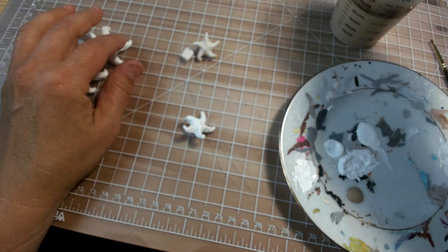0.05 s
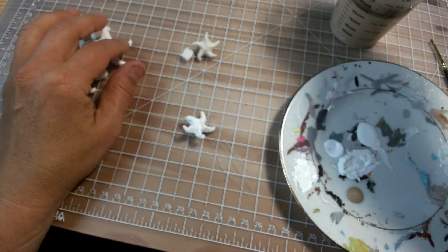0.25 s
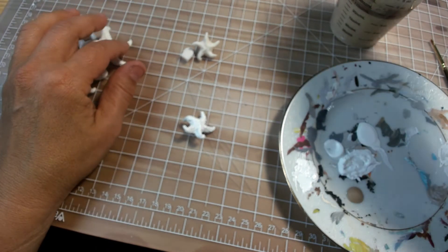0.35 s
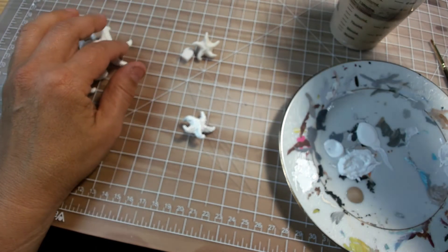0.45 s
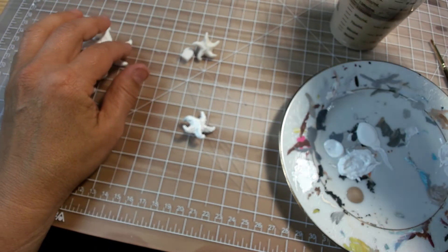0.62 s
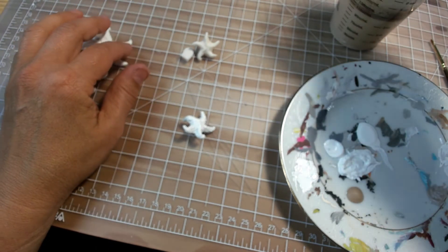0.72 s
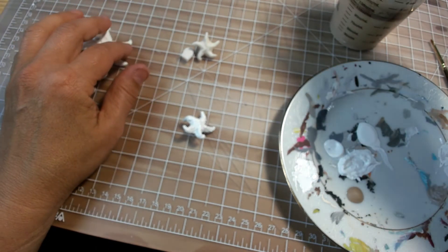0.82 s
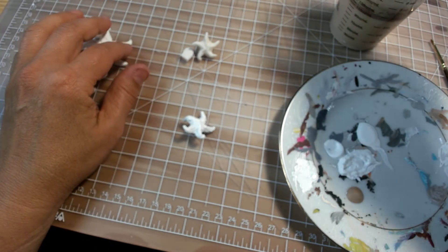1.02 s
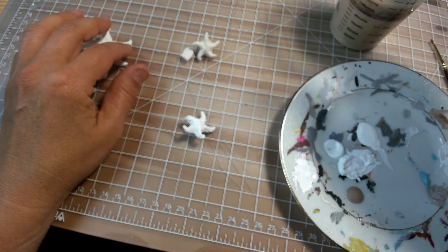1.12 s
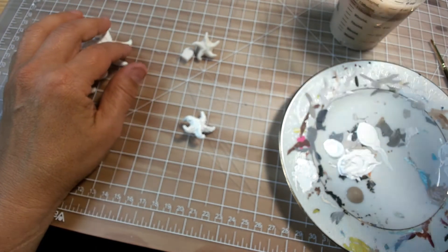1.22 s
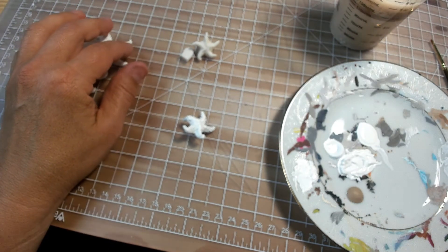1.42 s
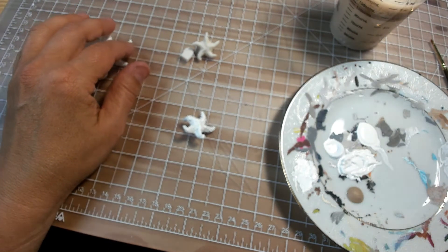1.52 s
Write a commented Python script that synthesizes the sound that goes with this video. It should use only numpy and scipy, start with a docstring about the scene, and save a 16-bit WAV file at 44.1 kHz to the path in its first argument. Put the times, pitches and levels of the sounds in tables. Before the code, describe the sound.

Small hard clay pieces click together and are set down on a plastic mat.

```python
"""A small, hard clay piece is nudged, tips over and rings, close by on a plastic mat.
Pieces held under the fingers click dryly, some knocking the mat; one more drops and rocks to rest.
Each impact gives a crack of noise and excites the damped modes of the object struck.
Between the clicks, friction makes gritty swells as the fingers rub the clay.
A small, quiet room reverberates over a low ventilation hum."""
import sys
import numpy as np
from scipy import signal
from scipy.fft import rfft, irfft, next_fast_len
from scipy.io import wavfile
from scipy.ndimage import uniform_filter1d

SR = 44100
rng = np.random.default_rng(int(sys.argv[2]) if len(sys.argv) > 2 else 0)


def to_wav(sig):
    """Store sig (one row per channel, or 1-D mono) as 16-bit WAV at the path in sys.argv[1].

    Samples outside -1..1 are clipped; the rate is SR.
    """
    pcm = np.clip(np.atleast_2d(sig), -1, 1) * 32767
    pcm = np.round(pcm).astype(np.int16)
    wavfile.write(sys.argv[1], SR, pcm.T)  # frames by channels


N = 68355
t = np.arange(N) / SR
TOP_HZ = 16000


def held_clicks():
    """Damping by contact: pieces held under the hand lose their vibration fast and click dryly."""
    # Each row: start in seconds, relative level, body and treble in dB, pitch ratio,
    # presence in dB, body resonance in Hz.
    contacts = [(.3235, -2, -4, 4, 1.034, -2.5, 1420), (.3302, -6, -0.5, -4, .99, 2, 1307),
                (.3585, -30.5, 14, -11, .99, 1.5, 1500), (.4203, -39, 23.5, -11, 1.03, 6, 1540),
                (.4374, -15.5, 5, 0.5, .98, -2.5, 2000), (.4502, -21.5, 6.5, -1, 1.01, 2, 1930),
                (.5315, -39.5, 6, -10.5, .98, 12.5, 1699), (.5474, -13.5, 3, -1.5, 1.0, .5, 1544),
                (.6636, -20.5, 10.5, -0.5, .99, 7, 1920), (.7678, -6, -1.5, -1.5, 1.09, -4.5, 2100),
                (.7773, -11.5, -0.5, -2.5, 0.98, -2.5, 1390)]
    # Each row: mode frequency in Hz, relative level in dB.
    modes = [(1380, -12), (1800, -13.5), (2050, -14), (2480, -19), (3310, -8), (3700, -8), (4750, -9),
             (5250, -4), (5600, -12), (6150, -4), (6600, -7.5), (7620, -8), (8100, -13), (9270, -19.5)]
    return undb(-1.5) * impacts(contacts, modes, ring_t60=0.043, damping=0.54,
                                crack_db=0.5, crack_t60=0.012, rise_s=0.00059)


def tipping_piece():
    """Free vibration: a hollow-sounding piece is nudged, tips over and rings in its own modes."""
    # Each row: start in seconds, relative level, body and treble in dB, pitch ratio.
    contacts = [(.0651, -27.5, 11.5, 4, .935), (.0805, -34, 5, -2, 1.1), (.2012, -17, -1.5, 5, 0.96),
                (.2036, -20.5, 0.5, -11.5, 0.97), (.2115, -25.5, 1.5, -15, 1), (.2185, -27, 5, -13, 1.04),
                (.2275, -31.5, 9, 0.5, .98)]
    # Each row: mode frequency in Hz, relative level in dB.
    modes = [(840, -5), (930, -18.5), (1390, -9), (1520, -13), (1900, -8), (2085, -8.5), (2600, -9.5),
             (3300, -13.5), (3600, -8.5), (4580, -14), (5170, -4.5), (5500, -5), (6520, -7.5), (7050, -9.5),
             (8340, -12)]
    return undb(-2.5) * impacts(contacts, modes, ring_t60=0.062, damping=0.25,
                                crack_db=-1.5, crack_t60=0.011, rise_s=0.00032)


def rocking_piece():
    """Inelastic collisions: a dropped piece lands, then rocks to rest in ever weaker contacts."""
    # Each row: start in seconds, relative level, body and treble in dB.
    contacts = [(1.1503, -13.5, 2, -6), (1.1516, -7, -4, -17), (1.2074, -22.5, -3, -14),
                (1.2296, -24.5, 1, -18), (1.2398, -27, 0.5, -13), (1.2572, -29, 3.5, -16),
                (1.2643, -32.5, 5.5, -15), (1.2775, -39.5, 9, -14)]
    # Each row: mode frequency in Hz, relative level in dB.
    modes = [(830, -21.5), (980, -22.5), (1385, -8.5), (1510, -16.5), (2030, -16.5), (3430, -6.5),
             (3630, -10), (5050, -11.5), (5850, -7), (6150, -8), (6760, -13.5), (8680, -9)]
    return undb(-1.5) * impacts(contacts, modes, ring_t60=0.063, damping=0.55,
                                crack_db=2.5, crack_t60=0.013, rise_s=0.00034)


def mat_knocks():
    """Structure-borne sound: some blows pass into the mat and desk and excite their lower modes."""
    # Each row: start in seconds, relative level in dB.
    contacts = [(.3245, -27), (.3490, -37.5), (.5480, -44), (.7685, -33.5)]
    # Each row: mode frequency in Hz, relative level in dB.
    modes = [(440, -8), (560, -5.5), (670, -7), (780, -4), (1025, 2), (1320, -2.5)]
    return undb(4) * impacts(contacts, modes, ring_t60=0.085, damping=0.5,
                             crack_db=-9, crack_t60=0.088, rise_s=0.002)


def impacts(contacts, modes, **material):
    """Superposition: the sounds of all the contacts of one object add up."""
    out = np.zeros(N)
    for start, *blow in contacts:
        add(out, start, strike(modes, *blow, **material))
    return out


def strike(modes, level_db, body_db=0, treble_db=0, pitch=1, presence_db=0, body_hz=1450, *,
           ring_t60, damping, crack_db, crack_t60, rise_s):
    """Impulse excitation: a blow cracks and rings the modes, coloured by where and how hard it lands."""
    # Each row: frequency in Hz, relative spectral density of the crack in dB.
    crack_spectrum = [(60, -45), (600, -11), (1300, -14), (2000, -5.5), (2800, -12.5), (3500, 1.5),
                      (4300, -10), (5700, 1.5), (7800, -4.5), (10500, -17), (15000, -22.5), (17000, -30)]
    size = 8192
    age, hz = t[:size], np.array(modes)[:, :1]
    # ring_t60 is the ring time in seconds at 1 kHz; it falls with frequency to the power 'damping'.
    decays = np.array([undb(db) * fade(ring_t60 * (f / 1000) ** -damping)[:size] for f, db in modes])
    scatter = undb(1.2 * rng.standard_normal(hz.shape))
    phase = rng.random(hz.shape)
    ring = (scatter * decays * np.sin(2 * np.pi * (hz * pitch * age + phase))).sum(0)
    crack = undb(crack_db) * noise(crack_spectrum, size) * fade(crack_t60)[:size]
    onset = 1 - np.exp(-(age / rise_s) ** 2)
    tone = [(body_hz / 2, body_db / 2 - 7.5), (body_hz, body_db + 3),
            (2700, (body_db + presence_db) / 3), (3600, presence_db), (5000, 0), (7800, 0),
            (10800, treble_db), (TOP_HZ, 1.4 * treble_db)]
    return undb(level_db) * colour((ring + crack) * onset, tone)


def rubbing(grain_hz=450, grain_db=3.2):
    """Sliding friction: dry clay moves on clay under the fingers in short, gritty swells of noise."""
    # Each row: start in seconds, length in seconds, level in dB.
    rubs = [(0.068, 0.12, -56), (0.218, .035, -47.5), (0.267, 0.056, -42), (0.29, .01, -41.5),
            (0.337, .03, -37), (0.476, 0.082, -56), (0.674, 0.13, -51), (.90, 0.072, -62)]
    # Each row: frequency in Hz, relative spectral density in dB.
    spectrum = [(500, -22.5), (1500, -7), (2600, -10), (3500, 0), (5500, 0), (8000, -1.5), (10000, -14),
                (15000, -21), (17000, -26)]
    swell = np.zeros(N)
    for start, length, db in rubs:
        add(swell, start, undb(db) * np.sqrt(np.hanning(int(length * SR))))
    grit = noise(spectrum) * undb(grain_db * walk(grain_hz))
    return swell * unit(grit)


def room(x, early_delay_s=0.006, early_t60=0.086, late_delay_s=0.02):
    """Reverberation: early reflections from the desk and nearby things, then the walls' diffuse tail."""
    # Each row: frequency in Hz, gain of the reflections in dB.
    wall_colour = [(200, 0), (700, 7), (1400, 2), (3500, -1), (7000, -7.5), (11000, -8.5), (16000, -14.5)]
    # Each row: frequency in Hz, time to decay by 60 dB in seconds.
    decay_times = [(300, 0.32), (1500, 0.24), (5000, 0.4), (8000, .36), (14000, 0.31)]
    hz = np.arange(N // 2 + 1) * SR / N
    spectrum = rfft(rng.standard_normal(N))
    late = np.zeros(N)
    for centre, t60 in decay_times:
        band = along([(f, float(f == centre)) for f, _ in decay_times], hz)
        late += irfft(spectrum * band, N) * fade(t60)
    early = rng.standard_normal(N) * fade(early_t60)
    response = np.zeros(N)
    add(response, early_delay_s, undb(-13.5) * unit(early))
    add(response, late_delay_s, undb(-17.5) * unit(late))
    return signal.fftconvolve(x, colour(response / np.sqrt(N), wall_colour))[:N]


def ventilation(waver=0.34):
    """Broadband and tonal noise: a low rush of air, with hum lines wavering in amplitude and phase."""
    # Each row: frequency in Hz, relative spectral density in dB.
    air_spectrum = [(15, -84), (25, -33), (87, -21.5), (108, -7), (200, -5), (263, -5), (285, -7.5),
                    (516, -15), (734, -21), (887, -19.5), (2350, -34.5), (3340, -36.5), (8590, -49),
                    (9570, -61.5), (16000, -63)]
    # Each row: frequency in Hz, level in dB.
    hum_lines = [(120, -52), (216, -53.5), (257, -53.5), (315, -57)]
    hum = np.zeros(N)
    for hz, db in hum_lines:
        modulation = 1 + waver * (walk(14.3) + 1j * walk(14))
        carrier = np.exp(2j * np.pi * (hz * t + rng.random()))
        hum += undb(db) * np.sqrt(2) * np.real(modulation * carrier)
    return undb(-44.5) * noise(air_spectrum) + hum


def undb(db):
    """Decibels to amplitude ratio."""
    return 10 ** (np.asarray(db) / 20)


def unit(x):
    """Normalisation to rms 1."""
    return x / np.sqrt(np.mean(x ** 2))


def fade(t60):
    """Exponential decay that loses 60 dB in t60 seconds."""
    return np.exp(-np.log(1000) * t / max(t60, 1e-4))


def along(points, hz):
    """Interpolation of (Hz, value) points on a log-frequency axis."""
    f, values = np.array(points, float).T
    return np.interp(np.log(np.maximum(hz, 1)), np.log(f), values)


def colour(x, points):
    """Minimum-phase filter with the given (Hz, dB) response."""
    n = next_fast_len(2 * len(x), True)
    n += n % 2
    gain = undb(along(points, np.arange(n // 2 + 1) * SR / n))
    cepstrum = irfft(np.log(gain))
    cepstrum[1:n // 2] *= 2  # folding onto positive time makes the filter causal
    cepstrum[n // 2 + 1:] = 0
    return irfft(rfft(x, n) * np.exp(rfft(cepstrum)))[:len(x)]


def noise(points, size=N):
    """White noise filtered to a (Hz, dB) spectrum, at rms 1."""
    return unit(colour(rng.standard_normal(size), points))


def walk(rate_hz):
    """Random modulation: steps smoothed twice into a wander of rms 1."""
    hold = int(SR / rate_hz)
    steps = np.repeat(rng.standard_normal(N // hold + 1), hold)
    return unit(uniform_filter1d(uniform_filter1d(steps, hold), hold)[:N])


def add(out, start, x):
    """Superposition of x on out, from start in seconds."""
    i = max(int(start * SR), 0)
    out[i:i + len(x)] += x[:N - i]


def scene():
    """Direct sound, reverberation and background add up in one channel."""
    direct = held_clicks() + tipping_piece() + rocking_piece() + mat_knocks() + rubbing()
    return (direct + room(direct) + ventilation())[None]


def record(dry):
    """Soft saturation rounds the loudest peaks; a low-pass filter cuts the highest treble."""
    rounded = dry / (1 + (dry / 0.95) ** 4) ** 0.25
    lowpass = signal.ellip(8, 0.2, 80, TOP_HZ, fs=SR, output="sos")
    return signal.sosfilt(lowpass, rounded)


dry = scene()
out = record(dry)
to_wav(out)
```